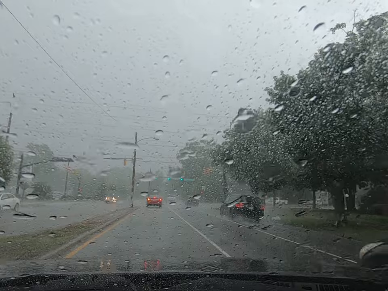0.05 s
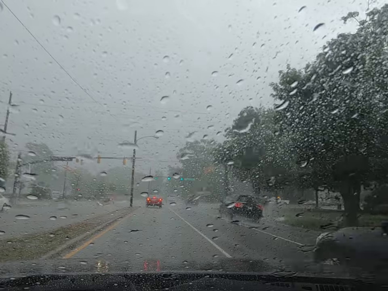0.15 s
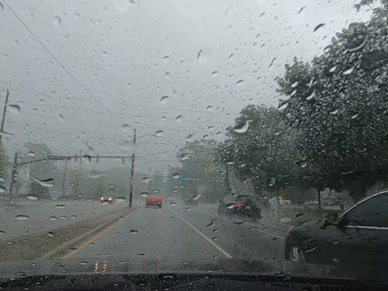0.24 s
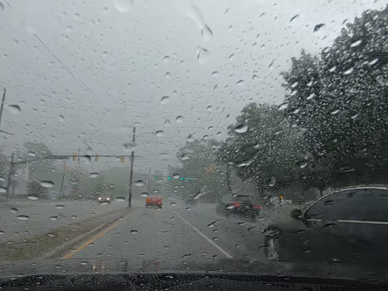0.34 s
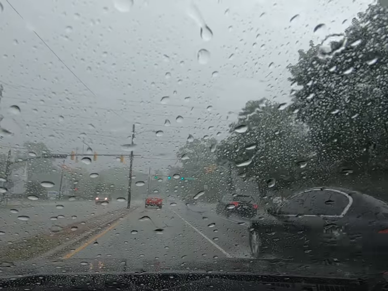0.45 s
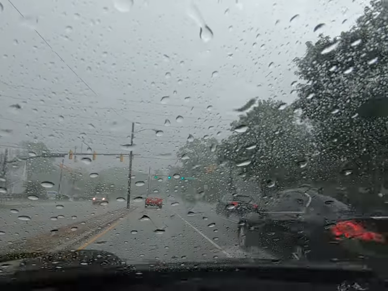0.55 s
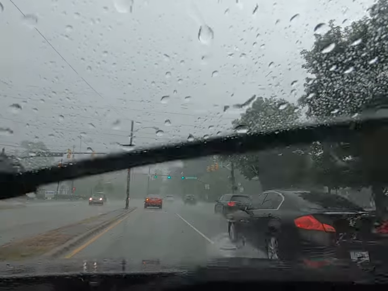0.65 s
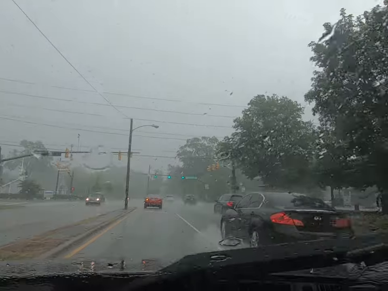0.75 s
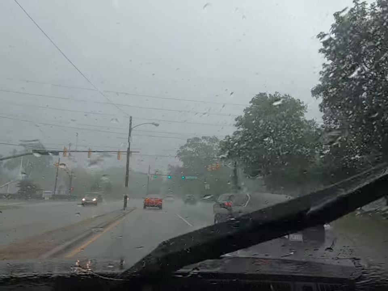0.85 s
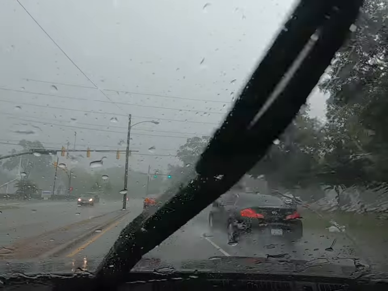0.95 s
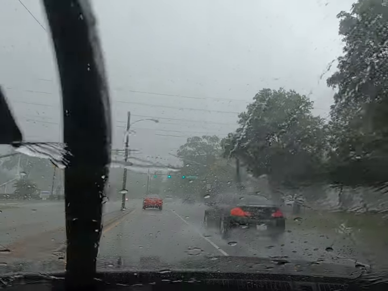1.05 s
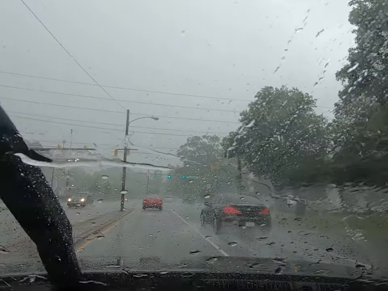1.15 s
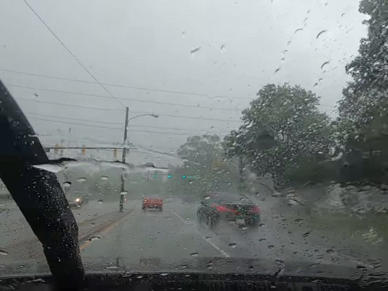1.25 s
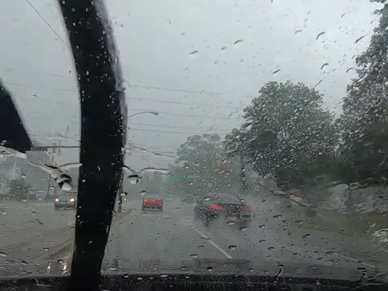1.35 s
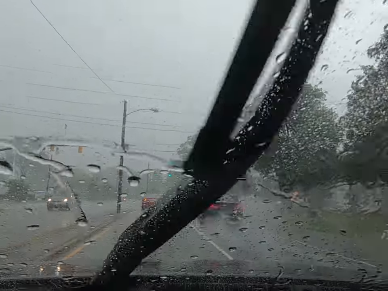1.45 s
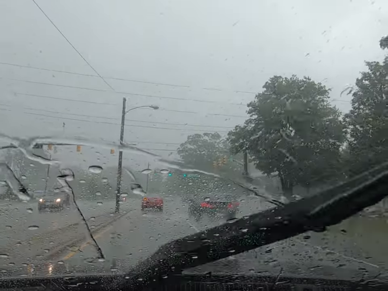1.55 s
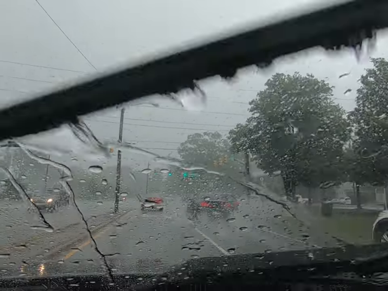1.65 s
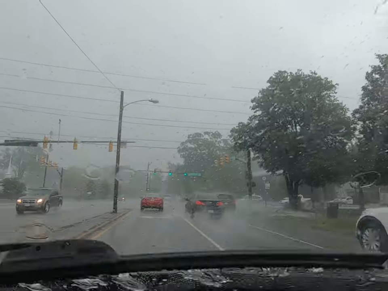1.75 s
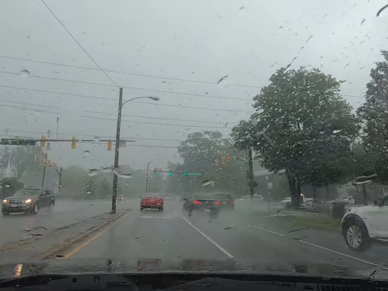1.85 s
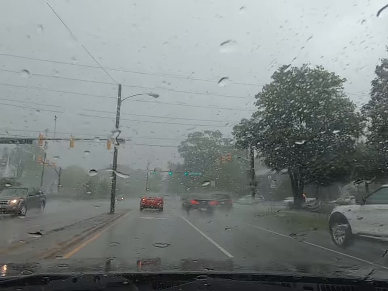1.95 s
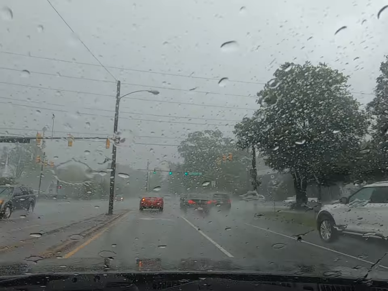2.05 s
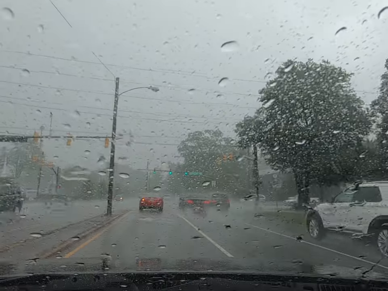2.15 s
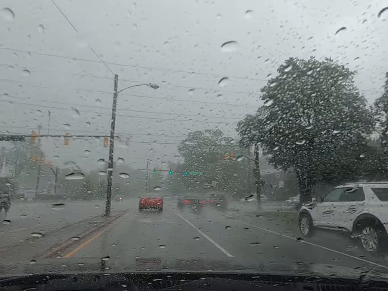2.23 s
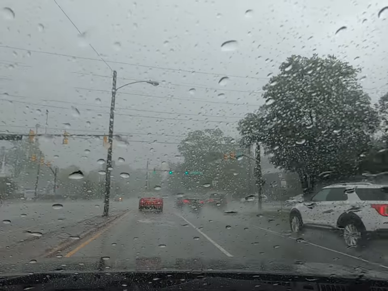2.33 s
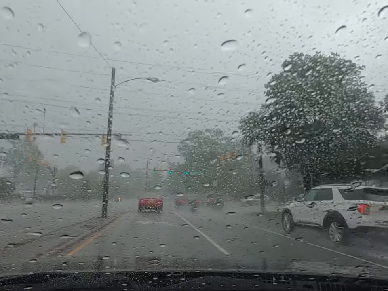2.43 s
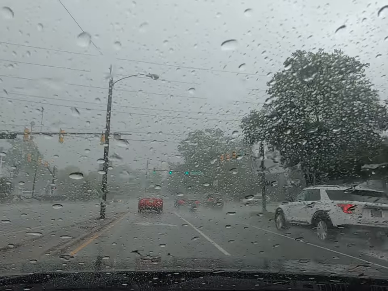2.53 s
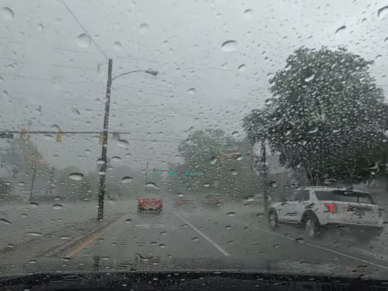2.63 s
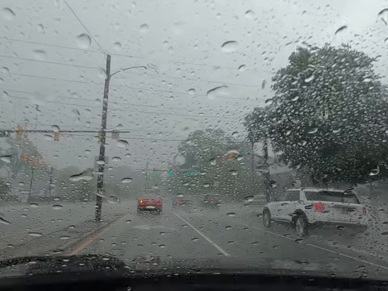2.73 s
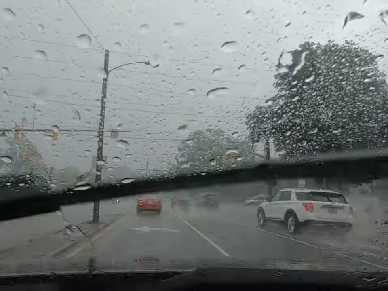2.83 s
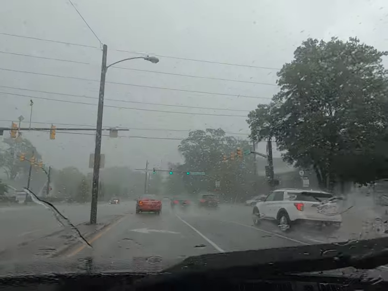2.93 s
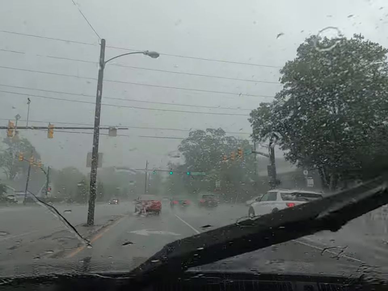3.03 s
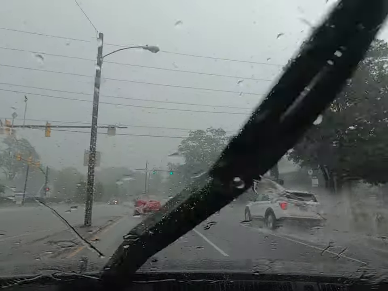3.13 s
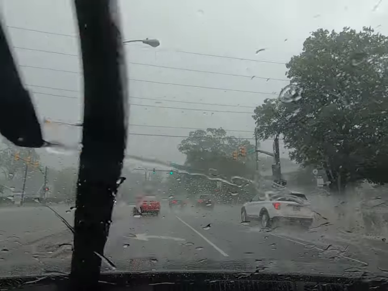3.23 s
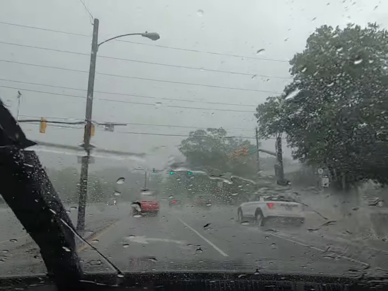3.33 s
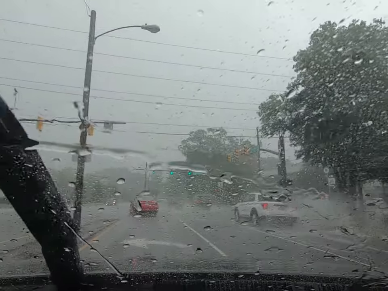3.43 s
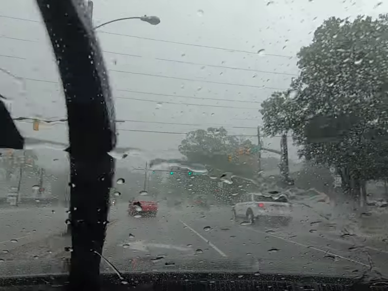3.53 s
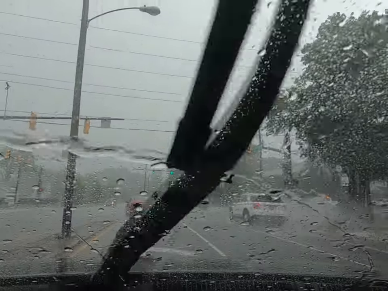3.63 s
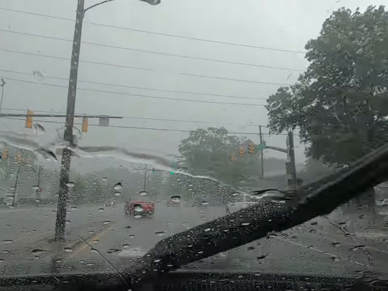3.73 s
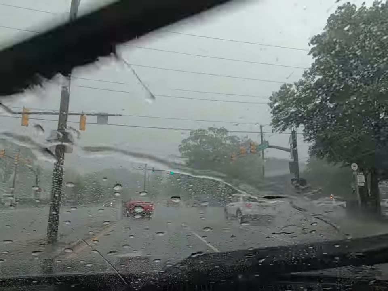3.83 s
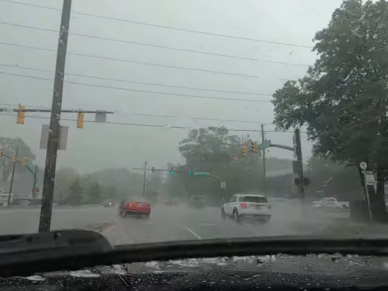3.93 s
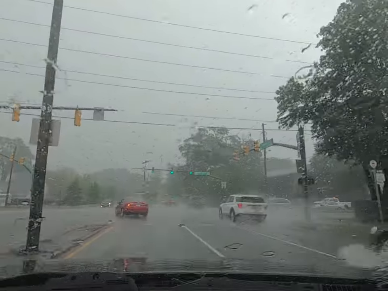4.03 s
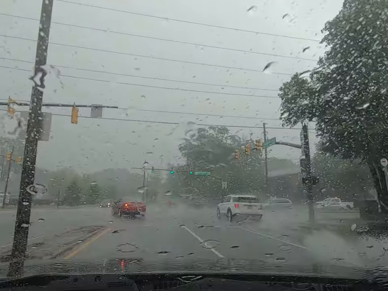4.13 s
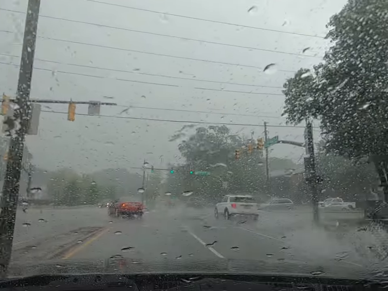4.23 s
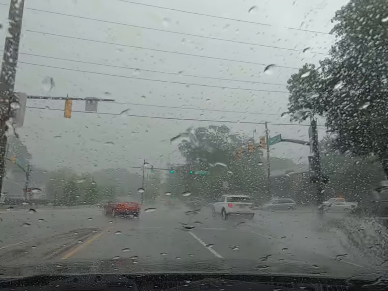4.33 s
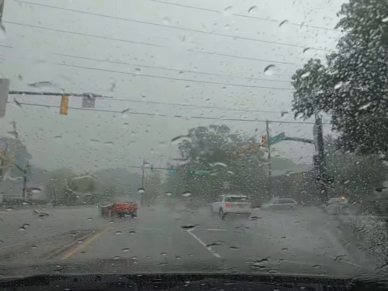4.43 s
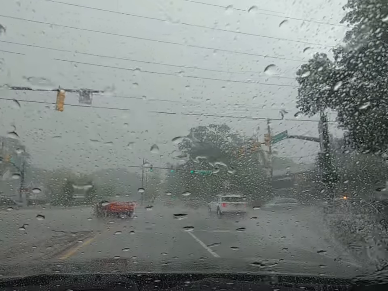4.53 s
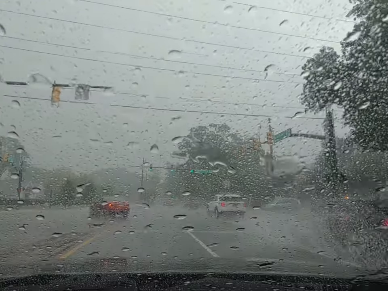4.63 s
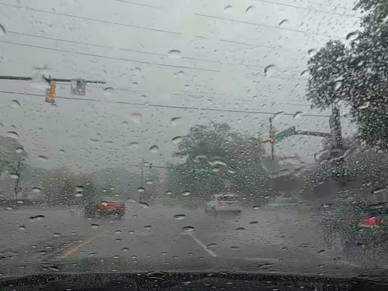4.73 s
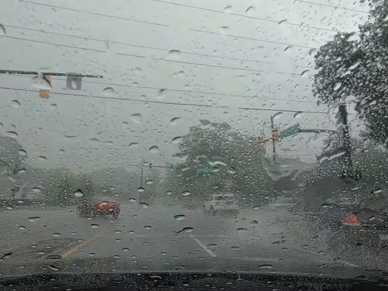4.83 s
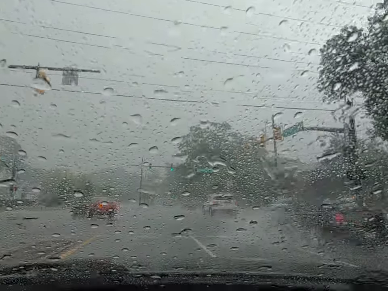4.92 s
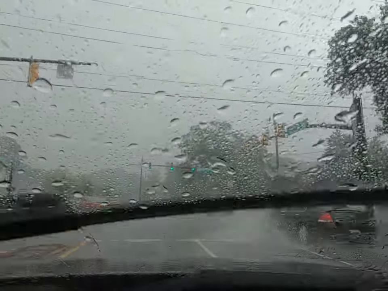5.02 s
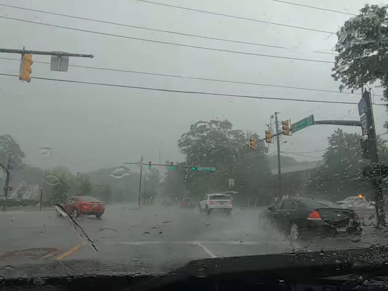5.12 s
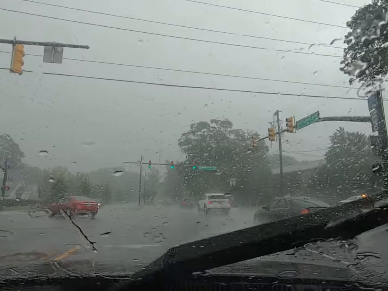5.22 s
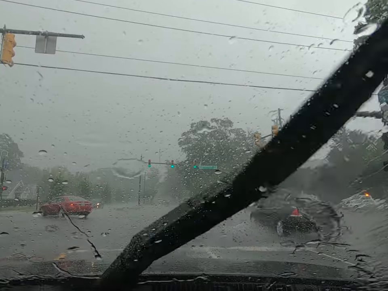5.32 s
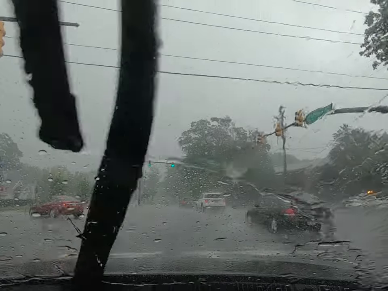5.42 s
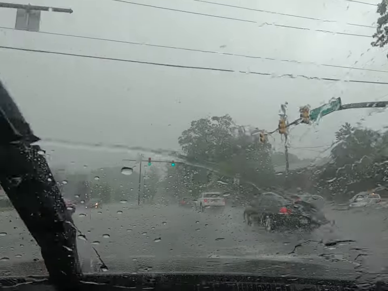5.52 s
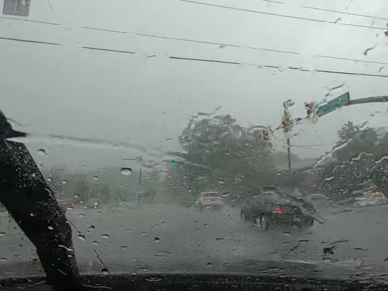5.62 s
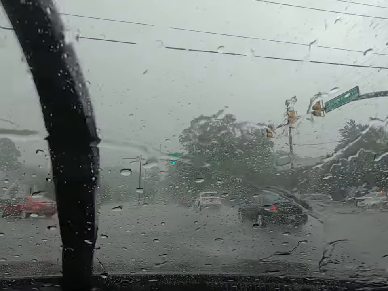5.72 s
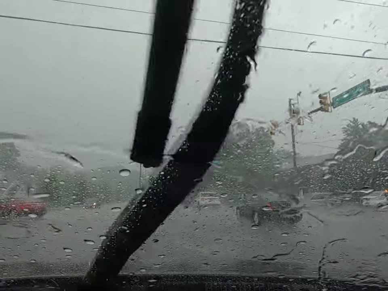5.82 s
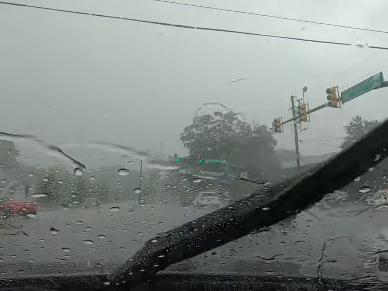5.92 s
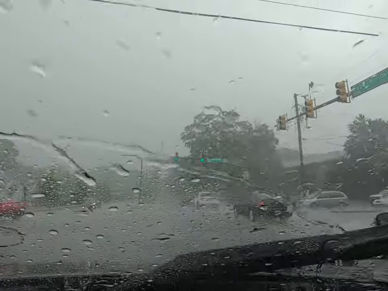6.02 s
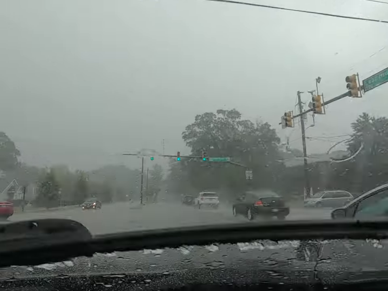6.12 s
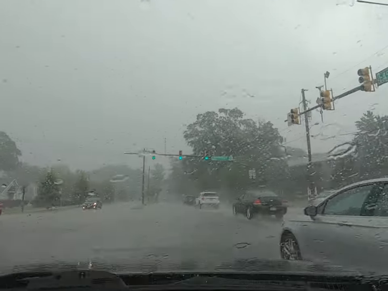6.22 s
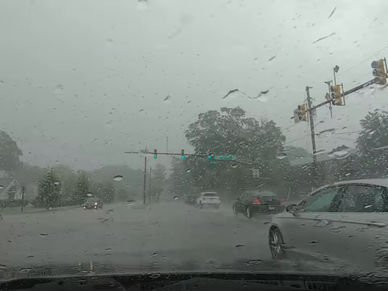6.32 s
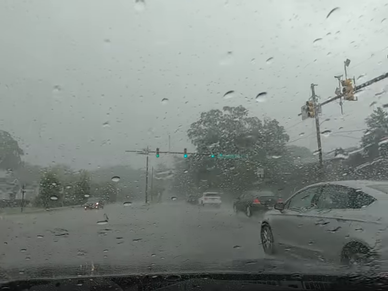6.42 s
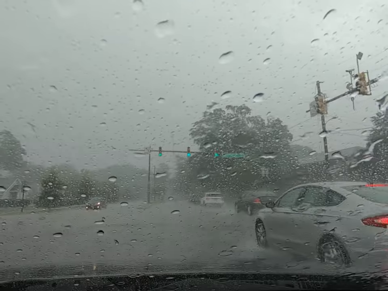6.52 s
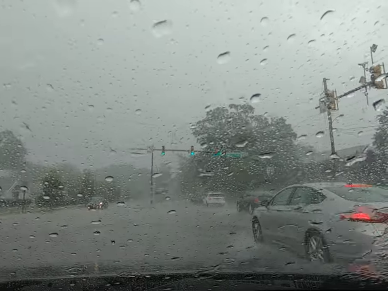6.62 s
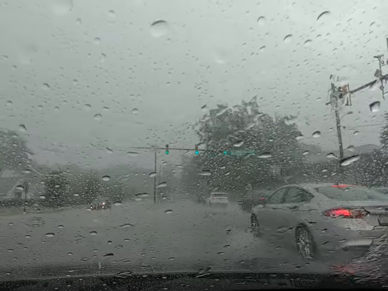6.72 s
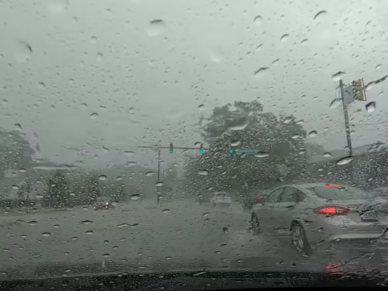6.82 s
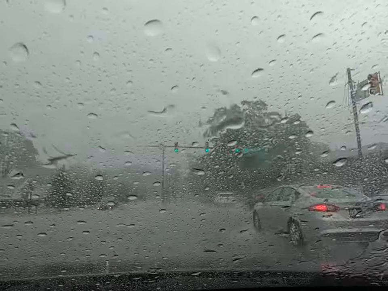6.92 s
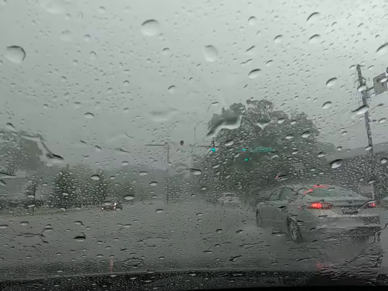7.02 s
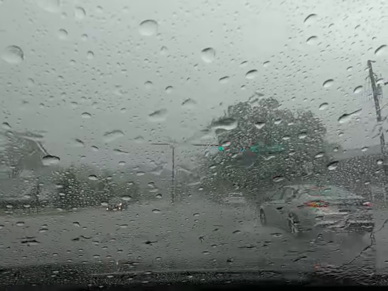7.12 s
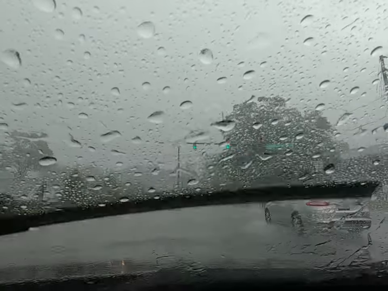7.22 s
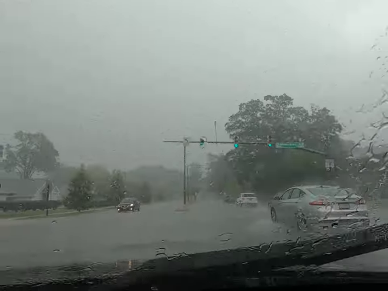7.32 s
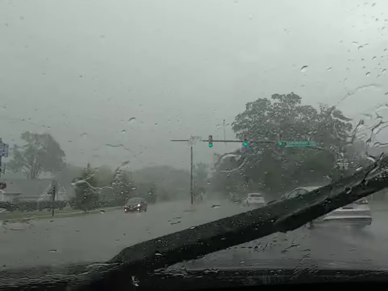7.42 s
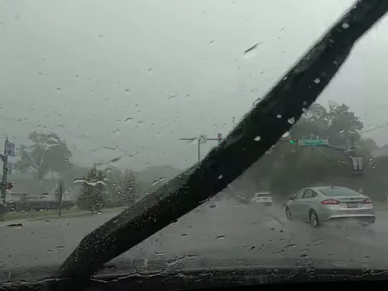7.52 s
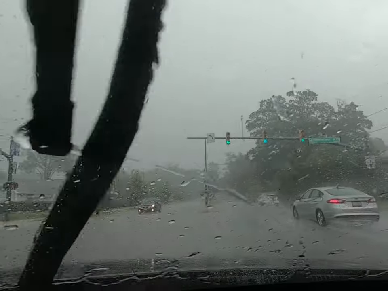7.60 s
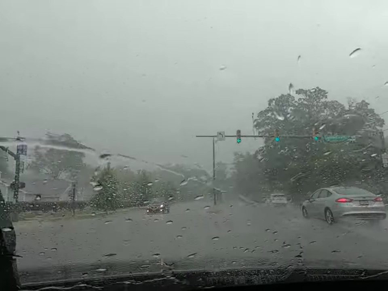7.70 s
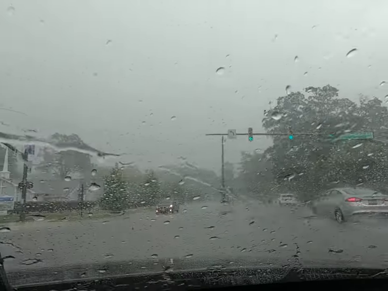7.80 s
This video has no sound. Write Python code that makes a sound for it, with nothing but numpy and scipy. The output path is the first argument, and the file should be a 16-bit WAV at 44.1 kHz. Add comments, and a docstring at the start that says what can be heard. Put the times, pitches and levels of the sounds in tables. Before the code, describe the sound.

Inside a car in steady rain, wipers groan and judder across wet glass four times over a low engine boom and tyre rumble.

```python
"""Pulling away in a downpour

Heard inside a car, from one microphone behind the windshield: random tiny blows, coloured by the glass
and the roof panel, make the patter, spit and drumming. The engine is a low booming sine, strongest early on;
the tyres are lumpy filtered noise that grows, unevenly, as the car gathers speed. Four times the wipers set
out: many small catches of rubber rub and groan through the pane, and regular slips make it judder.
Knocks, hard taps and small ticks stand out of the rain."""
import sys
import numpy as np
from scipy import signal
from scipy.fft import rfft, irfft, next_fast_len
from scipy.io import wavfile
from scipy.ndimage import uniform_filter1d

SR = 44100
rng = np.random.default_rng(int(sys.argv[2]) if len(sys.argv) > 2 else 0)


def file_out(sig):
    """Save sig as 16-bit WAV at sys.argv[1]."""
    # one column per channel
    cols = np.atleast_2d(sig).T
    # limit, then scale
    lim = np.clip(cols, -1, 1)
    pcm = np.round(lim * 32767).astype(np.int16)
    wavfile.write(sys.argv[1], SR, pcm)


N = 346626  # length [samples]

# how hard the rain beats on the glass, before wiping, gusts and trims: (time [s], level [dB])
RAIN_LEVEL = [(0, -41.5), (.8, -41.5), (.88, -42.5), (1.5, -42.5), (2.9, -42.5), (3.45, -43), (4.1, -39),
              (4.55, -37.5), (5.12, -37), (5.25, -39.5), (5.6, -41), (6.3, -39), (7.5, -39), (7.86, -41)]
# colour of a drop heard through the glass: (frequency [Hz], gain [dB])
GLASS_COLOUR = [(500, -5.5), (900, -0.5), (1100, 4.5), (1300, 2), (1750, -0.2), (2100, 1), (2600, -2),
                (3400, -2), (4000, -7.5), (4600, -12.5), (5200, -22), (5900, -40), (8000, -41.5)]
# colour of the fine spit of bursting drops: (frequency [Hz], gain [dB])
SPIT_COLOUR = [(4000, -9), (5800, -4), (7000, 0), (8000, -3), (11000, -7), (13000, -15.5), (15000, -22)]
# colour of the roof panel overhead: (frequency [Hz], gain [dB])
ROOF_COLOUR = [(100, -13.5), (140, -1), (180, 3), (240, -6), (310, -4.5), (400, -7.5), (470, -11.5),
               (650, -10.5), (800, -16), (1000, -22.5), (1500, -32.5)]
# engine boom in the cabin, before its waver: (time [s], level [dB])
ENGINE_LEVEL = [(0, -20), (.3, -18), (.5, -26), (.65, -20), (.85, -31.5), (1.18, -16.5), (1.45, -28.5),
                (1.7, -15), (2.02, -24), (2.25, -14.5), (2.52, -19.5), (2.62, -25), (3.5, -25),
                (3.8, -30.5), (5.6, -30.5), (6.45, -21.5), (7.86, -33.5)]
# the engine's firing rate: (time [s], rate [Hz])
FIRING_RATE = [(0, 44.2), (.65, 41.5), (1.45, 37.94), (1.8, 43.8), (2.15, 39.22), (2.55, 38.7),
               (2.95, 35.9), (3.35, 44.9), (5.5, 46.96), (6.5, 39.37)]
# tyre rumble, relative level before a fixed lift: (time [s], level [dB])
ROAD_LEVEL = [(0, -33), (.6, -28), (1.05, -33.5), (2.6, -27.5), (3.1, -31), (3.5, -29.5), (3.75, -35),
              (4.6, -27.5), (5.3, -31), (5.8, -27.5), (7.25, -23.5), (7.53, -34.5), (7.86, -24.5)]
# colour of the tyre rumble: (frequency [Hz], gain [dB])
RUMBLE_COLOUR = [(18, -13.5), (26, 5), (34, 0), (50, 0), (64, -0.5), (85, 2), (105, -4), (130, -10.5),
                 (200, -21.5)]
# wiper strokes; the rubbing level is relative and also scales the scrape and the groan:
# (start [s], swish level [dB], rubber bites after [s], rubbing level [dB], rubbing held [s],
#  rubbing dies away [dB/s], scrape level against the rubbing [dB], blade resonance level [dB])
WIPER_STROKES = [ (.59, -19, .125, -16.5, .38, 55, -2.5, -12),
                 (2.79, -19, 0.14, -21.5, 0.31, 130, -6, -7.5),
                 (4.99, -16, 0.171, -17.5, 0.36, 57, -1, -11), (7.187, -18, .145, -20.5, .39, 55, -6, -7.5),
                 ]
# modes of the windshield and cowl: (frequency [Hz], width [Hz], gain [dB])
PANE_MODES = [(131, 26.7, -0.5), (202.6, 25, 2), (277.6, 22.4, 1.5), (311.3, 36.6, -1.5), (391, 60.5, -5),
              (483.5, 34, -9), (537.4, 28, -11.5), (650, 152, -20), (800, 90, -21.5), (1050, 300, -33.5)]
# single knocks from the blades and the body: (time [s], peak [dB], lower edge [Hz], upper edge [Hz])
BODY_KNOCKS = [(.652, -10, 131, 328), (.7, -19.5, 470, 680), (.732, -12, 150, 450), (.77, -17, 370, 760),
               (.969, -16, 445, 1000), (1.088, -17.5, 270, 760), (2.509, -5.5, 145, 440),
               (2.714, -24, 263.4, 794), (2.816, -12.5, 170, 398), (2.858, -9, 171, 396),
               (3.21, -14.5, 230, 480), (3.23, -8, 215, 447), (3.268, -17, 220, 397),
               (3.479, -22, 450, 950), (4.2, -13.5, 131, 274), (5.176, -10.5, 350, 846),
               (5.342, -14.5, 189, 800), (5.412, -13, 170, 480), (7.256, -9.5, 200, 760),
               (7.73, -14, 105, 230)]
# fat drops tapping hard on the glass: (time [s], peak [dB], lower edge [Hz], upper edge [Hz])
DROP_SLAPS = [(5.538, -27.5, 1070, 1199), (7.2175, -15.5, 850, 2250), (7.2575, -18, 950, 2000),
              (7.423, -23.5, 998, 1950), (7.6025, -21, 1100, 1950)]
# small sharp ticks, the faintest of them from drops on the glass, relative level before a fixed lift: (time
# [s], peak [dB], upper edge [Hz])
SHARP_TICKS = [(.616, -29.5, 16010), (2.965, -44, 8950), (6.023, -42, 12040), (6.215, -42, 13960),
               (7.065, -42, 14000), (7.603, -29, 7960), (7.629, -36, 7500)]
# colour of a tick: (frequency [Hz], gain [dB])
TICK_COLOUR = [(3500, -6), (5100, 3), (6500, -1), (8200, -2), (11000, -16), (13000, -24.5)]
# bursts in which the rubber locks into a judder; the level sags and the rate jitters within each:
# (start [s], length [s], level [dB], first slip rate [Hz], last slip rate [Hz])
JUDDER_BURSTS = [ (.778, 0.045, -11.5, 189.1, 201.3), (.83, 0.0901, -15.5, 222, 268),
                 (.98, .12, -21, 334.4, 305), (2.964, 0.055, -10.5, 190.6, 194.5),
                 (3.024, 0.1486, -12, 186, 176.5), (5.06, 0.064, -15, 212.6, 204.9),
                 (5.19, .085, -12.5, 202.4, 213.7), (5.277, 0.0845, -15, 232.5, 191.7),
                 (5.385, 0.055, -20.5, 184.1, 186.3), (5.44, 0.0736, -20, 304.1, 279),
                 (5.52, .06, -19.5, 165, 139.3), (7.378, .054, -11.5, 192.5, 215.6),
                 (7.433, .088, -15.5, 227.9, 200.4), (7.522, 0.075, -13.5, 187.4, 175.4),
                 (7.61, .07, -23, 299.6, 315), ]

PATTER_DB, SPIT_DB = 1, -23  # against the shower's level on the glass
ROOF_DB, ROOF_DB_PER_SHOWER_DB = -28, 0.84  # drumming at the mean shower level; how far it follows
# the rain eases behind the blades: depth, delay after the stroke starts, time to full depth
WIPED_DB, WIPED_AFTER_S, WIPED_FALL_S = -1.5, 0.16, 0.22
WIPED_SHRINK_DB_PER_S = 17.5  # the depth itself then shrinks as a gain falling at this rate

STROKE_S = .69  # from rest to the far edge of the glass
SWISH_AT_S, SWISH_S = .097, .062  # centre and width of the soft first swish
RUB_ATTACK_S, RUB_DB = .03, -1
RUB_SLOW_DB, RUB_SAG_DB_PER_S = -1, 6.5  # a crawling blade is quieter; rubbing fades as the glass clears
CATCH_FLUTTER_DB = .6
SCRAPE_HOLD_S, SCRAPE_RELEASE_DB_PER_S = 0.099, 110
BLADE_START_HZ, BLADE_RISE_HZ = 480, 190
GROAN_SLOW_HZ, GROAN_RISE_HZ = 130, 95
GROAN_DB, GROAN_RELEASE_DB_PER_S = -2.5, 30  # level against the rubbing

LINKAGE_LOW_HZ = 138  # lower edge of the linkage's knocks
LIFT_AFTER_S, LIFT_DB, LIFT_EDGE_HZ = .06, -13.5, 360  # the linkage takes up the load
TURN_DB, TURN_EDGE_HZ = -15.5, 460  # the blades flip over at the far edge
JUDDER_EDGE_S, JUDDER_SAG_DB_PER_S = 0.0071, 24  # build-up and stop; weakening as it runs
TOP_HZ = 15300  # upper limit of the recorder


def undb(db):
    """Decibels to gain."""
    return 10 ** (np.asarray(db) / 20)


def unit(x):
    """Scale to an rms of 1."""
    return x / np.sqrt(np.mean(x ** 2) + 1e-18)


def curve(rows):
    """Each column of a table, joined by straight lines in time."""
    s, *columns = np.transpose(rows)
    return [np.interp(np.arange(N) / SR, s, c) for c in columns]


def latest(table):
    """Time since the latest event began (negative before the first), then that event's settings."""
    t, rows = np.arange(N) / SR, np.array(table)
    current = np.maximum(np.searchsorted(rows[:, 0], t) - 1, 0)
    start, *settings = rows[current].T
    return t - start, *settings


def envelope(age, attack_s, hold_s, release_db_per_s):
    """Rise, hold, and die away."""
    rise = np.clip(age / attack_s, 0, 1)
    return rise * undb(-release_db_per_s * np.maximum(age - attack_s - hold_s, 0))


def bump(age, at_s, width_s):
    """A brief smooth swell."""
    return np.exp(-((age - at_s) / width_s) ** 2)


def walk(rate):
    """Slow chance: random levels held 1 / rate seconds and smoothed twice, spread 1."""
    k = max(int(SR / rate), 1)
    held = np.repeat(rng.standard_normal(N // k + 1), k)[:N]
    return unit(uniform_filter1d(uniform_filter1d(held, k), k))


def bandpass(x, low_hz, high_hz):
    """Keep one band, with steep edges."""
    return signal.sosfilt(signal.butter(4, [low_hz, high_hz], "bandpass", fs=SR, output="sos"), x)


def colour(x, points):
    """Causal filter whose gain follows (Hz, dB) points and falls 20 dB per octave outside them."""
    size = next_fast_len(len(x) + 8192, True)
    size += size % 2
    octave = np.log2(np.maximum(np.fft.rfftfreq(size, 1 / SR), 1))
    hz, db = np.transpose(points)
    outside = np.abs(octave - np.clip(octave, np.log2(hz[0]), np.log2(hz[-1])))
    gain = undb(np.interp(octave, np.log2(hz), db) - 20 * outside)
    # folding the cepstrum forward in time gives minimum phase
    cepstrum = irfft(np.log(gain))
    cepstrum[1:size // 2] *= 2
    cepstrum[size // 2 + 1:] = 0
    return irfft(rfft(x, size) * np.exp(rfft(cepstrum)))[:len(x)]


def impacts(per_s, spread_db):
    """Random tiny blows: many weak ones, a few strong."""
    lands = rng.random(N) < per_s / SR
    size = undb(spread_db * np.minimum(rng.exponential(size=N), 5))
    return unit(lands * size * rng.choice([-1, 1], N))


def rain():
    """Drops patter and spit on the glass and drum on the roof; the big ones come in clusters."""
    age, *_ = latest(WIPER_STROKES)
    wiped = envelope(age - WIPED_AFTER_S, WIPED_FALL_S, 0, WIPED_SHRINK_DB_PER_S)
    shower_db = curve(RAIN_LEVEL)[0] + WIPED_DB * wiped
    roof_db = ROOF_DB + ROOF_DB_PER_SHOWER_DB * (shower_db - shower_db.mean())
    gust_db = 1.0 * walk(55)
    clusters = undb(3 * np.tanh(walk(45)))
    heavy = unit(impacts(per_s=400, spread_db=2.5) * clusters)
    # glass and roof share the same big drops
    patter = unit(colour(impacts(per_s=12000, spread_db=2.0) + 0.41 * heavy, GLASS_COLOUR))
    spit = unit(colour(impacts(per_s=6000, spread_db=1.5) + 0.87 * heavy, SPIT_COLOUR))
    drum = unit(colour(impacts(per_s=1800, spread_db=2.5) + 0.53 * heavy, ROOF_COLOUR))
    glass = patter * undb(PATTER_DB) + spit * undb(SPIT_DB + 0.5 * walk(36))
    return glass * undb(shower_db + gust_db) + drum * undb(roof_db)


def car(road_lift_db=5.0, waver_db=.7):
    """The firing rate booms in the cabin as a sine, over the noise rumble of the tyres."""
    hz, = curve(FIRING_RATE)
    engine_db, = curve(ENGINE_LEVEL)
    rumble_db, = curve(ROAD_LEVEL)
    boom = unit(np.sin(2 * np.pi * np.cumsum(hz) / SR))
    # the uneven road makes the rumble lumpy
    lumpy = rng.standard_normal(N) * undb(1.6 * walk(15))
    rumble = unit(colour(lumpy, RUMBLE_COLOUR))
    return boom * undb(engine_db + waver_db * walk(23)) + rumble * undb(rumble_db + road_lift_db)


def pane(force, low_hz, edge_hz):
    """The windshield rings in its modes; place and softness of the contact decide which ones."""
    modes = 0
    for k, (hz, width, db) in enumerate(PANE_MODES):
        ring = signal.lfilter(*signal.iirpeak(hz, hz / width, SR), force)
        modes = modes + (-1) ** k * undb(db) * ring
    return bandpass(modes, low_hz, edge_hz)


def steady(x):
    """The arm's spring presses evenly, so the rubbing keeps its strength from moment to moment."""
    power = uniform_filter1d(unit(x) ** 2, size=SR // 25)
    return unit(x / np.sqrt(power + 1e-3))


def gliding(force, hz, width_hz):
    """A resonance whose centre moves: shift it to zero, low-pass, and shift it back."""
    turn = np.exp(2j * np.pi * np.cumsum(hz) / SR)
    lowpass = signal.butter(2, width_hz / 2, fs=SR, output="sos")
    return unit((turn * signal.sosfilt(lowpass, force / turn)).real)


def wipers():
    """The blades swish, bite and rub; many small catches along the rubber shake the pane."""
    age, swish_db, bite_s, drag_db, hold_s, release, scrape_db, blade_db = latest(WIPER_STROKES)
    # the crank turns half a circle per stroke, so the blade is fastest midway
    crank = np.pi * np.clip(age / STROKE_S, 0, 1)
    speed = np.sin(crank)
    rubbed_s = np.maximum(age - bite_s, 0)
    load = undb(drag_db + RUB_DB + RUB_SLOW_DB * (1.0 - speed) - RUB_SAG_DB_PER_S * rubbed_s)
    drag = envelope(rubbed_s, RUB_ATTACK_S, hold_s, release)
    catches = impacts(per_s=5000, spread_db=1.0) * undb(CATCH_FLUTTER_DB * walk(35))

    # a slow blade only mutters; a fast one is brighter
    slow = steady(pane(catches, low_hz=151.0, edge_hz=395))
    fast = steady(pane(catches, low_hz=223, edge_hz=1150))
    swish = slow * undb(swish_db) * bump(age, SWISH_AT_S, SWISH_S)
    rubbing = np.sqrt(1 - speed ** 4) * slow + speed ** 2 * fast

    # the rubber scrapes brightly just after the bite
    scrape = steady(pane(impacts(per_s=5000, spread_db=0.5), low_hz=331, edge_hz=1300))
    scrape_shape = envelope(rubbed_s, RUB_ATTACK_S, SCRAPE_HOLD_S, SCRAPE_RELEASE_DB_PER_S)
    scrape = scrape * undb(scrape_db) * scrape_shape

    # the blade's own resonance glides upward until mid-stroke and stays there
    blade_hz = BLADE_START_HZ + BLADE_RISE_HZ * np.sin(np.minimum(crank, np.pi / 2)) ** 6
    blade = steady(gliding(catches, blade_hz, width_hz=80))
    rubbing = rubbing + blade * undb(blade_db) * speed

    # a low groan arches in pitch with the blade's speed
    groan_hz = GROAN_SLOW_HZ + GROAN_RISE_HZ * speed ** 2
    groan = steady(gliding(impacts(per_s=5000, spread_db=1.0), groan_hz, width_hz=96))
    groan = groan * undb(GROAN_DB) * envelope(rubbed_s, RUB_ATTACK_S, hold_s, GROAN_RELEASE_DB_PER_S)
    return swish + load * (rubbing * drag + scrape + groan)


def blows(rows, body, rattle_s, rattle):
    """Each blow is a push and a brief rattle, sent through a body and scaled to its peak."""
    out, t = np.zeros(N + SR), np.arange(SR // 4) / SR
    for s, db, *contact in rows:
        force = rattle * rng.standard_normal(len(t)) * np.exp(-t / rattle_s)
        force[0] += 1
        ring, start = body(force, *contact), int(s * SR)
        out[start:start + len(t)] += undb(db) * ring / np.abs(ring).max()
    return out[:N]


def tick(force, edge_hz):
    """A small hard contact; a softer one has less top."""
    lowpass = signal.butter(2, edge_hz, fs=SR, output="sos")
    return signal.sosfilt(lowpass, colour(force, TICK_COLOUR))


def slap(force, low_hz, high_hz):
    """A fat drop's tap; where it lands decides which band of the glass sounds."""
    return bandpass(force, low_hz, high_hz)


def taps(tick_lift_db=2.0):
    """The linkage knocks at both ends of a stroke; single knocks, taps and ticks join it."""
    starts = [start for start, *_ in WIPER_STROKES]
    lifts = [(start + LIFT_AFTER_S, LIFT_DB, LINKAGE_LOW_HZ, LIFT_EDGE_HZ) for start in starts]
    turns = [(start + STROKE_S, TURN_DB, LINKAGE_LOW_HZ, TURN_EDGE_HZ) for start in starts]
    knocks = blows([*BODY_KNOCKS, *lifts, *turns], pane, rattle_s=0.007, rattle=0.12)
    slaps = blows(DROP_SLAPS, slap, rattle_s=0.003, rattle=0.49)
    ticks = blows(SHARP_TICKS, tick, rattle_s=0.00057, rattle=0.75)
    return knocks + slaps + undb(tick_lift_db) * ticks


def judders(snap_db=-16, jitter=0.022, shake_db=0.1):
    """In short bursts the rubber slips at a near-regular rate; each slip snaps against the pane."""
    age, length_s, db, first_hz, last_hz = latest(JUDDER_BURSTS)
    hz = first_hz + (last_hz - first_hz) * np.clip(age / length_s, 0, 1)
    cycles = np.cumsum(hz * (1 + jitter * walk(90))) / SR
    gate = np.clip(np.minimum(age, length_s - age) / JUDDER_EDGE_S, 0, 1)
    swing = gate * undb(db - JUDDER_SAG_DB_PER_S * age + shake_db * walk(60))
    # one slip per whole cycle, of uneven strength
    slips = np.diff(np.floor(cycles), prepend=0) * undb(2.5 * walk(200))
    snaps = unit(pane(slips, low_hz=425, edge_hz=1170))
    hum = unit(np.sin(2 * np.pi * cycles))
    return (hum + undb(snap_db) * snaps) * swing


def scene():
    """Everything as it reaches one microphone behind the windshield."""
    return (rain() + car() + wipers() + taps() + judders())[None]


def record(dry):
    """The recorder rounds the loudest peaks and cuts the top."""
    rounded = dry / (1 + (dry / .8) ** 4) ** .25
    return signal.sosfilt(signal.ellip(8, .2, 70, TOP_HZ, fs=SR, output="sos"), rounded)


dry = scene()
out = record(dry)
file_out(out)
```